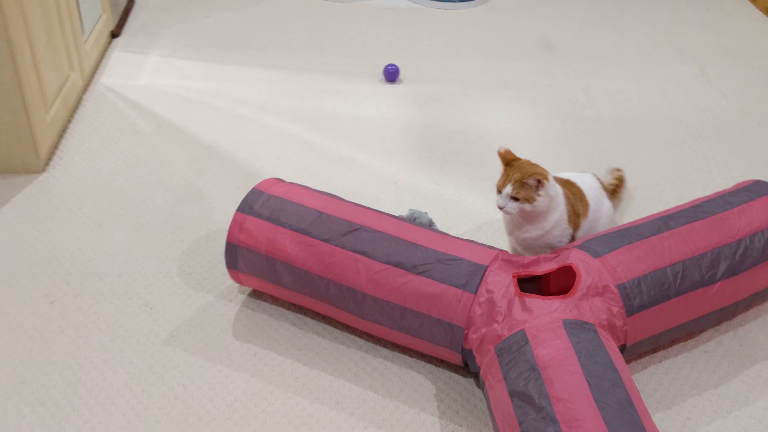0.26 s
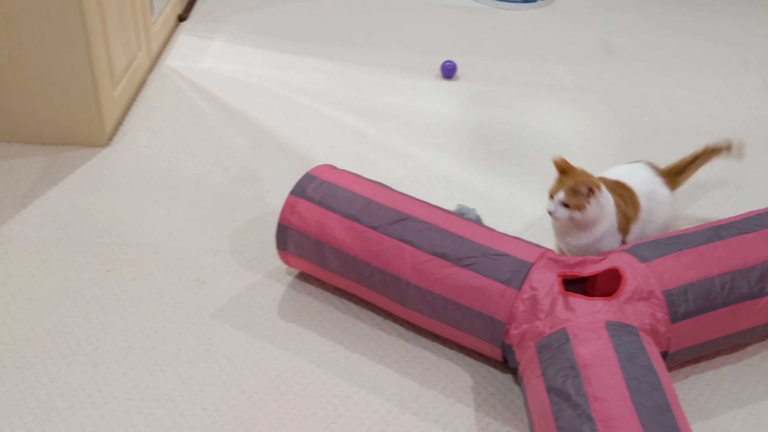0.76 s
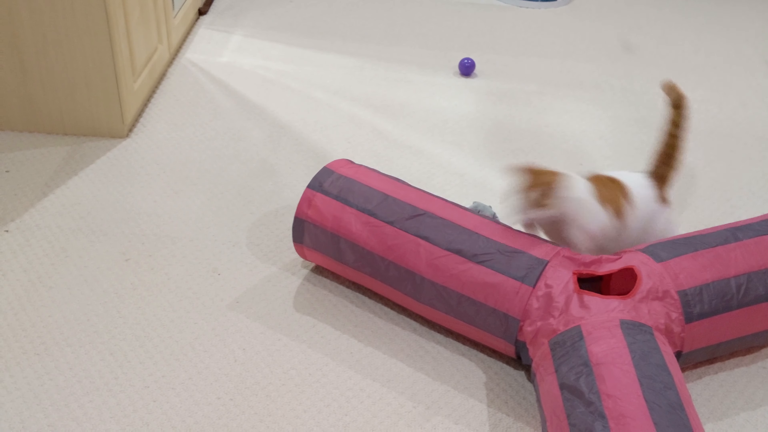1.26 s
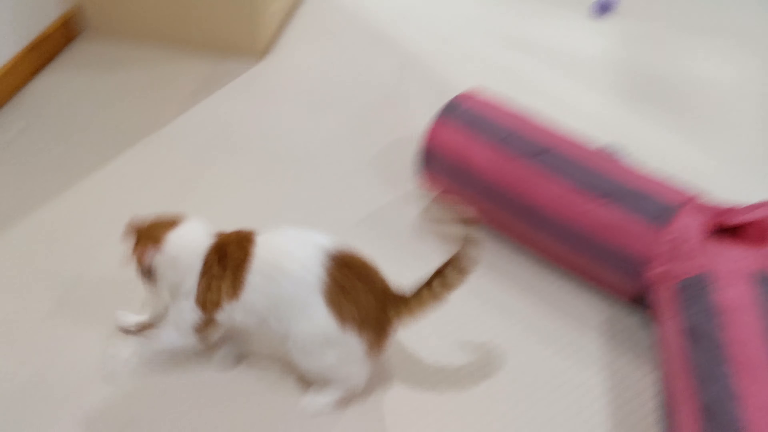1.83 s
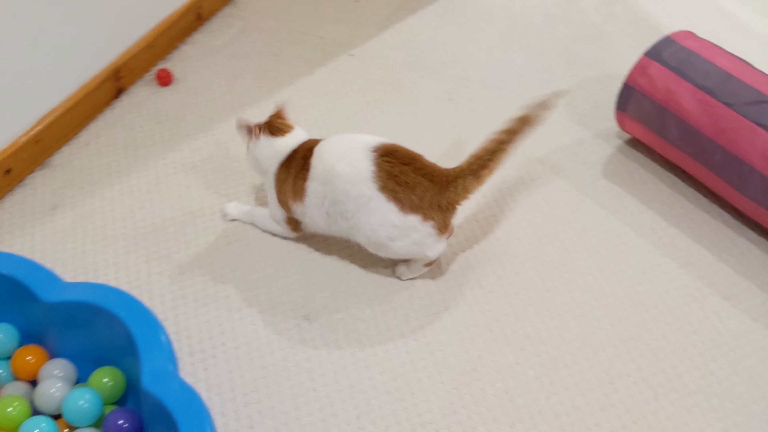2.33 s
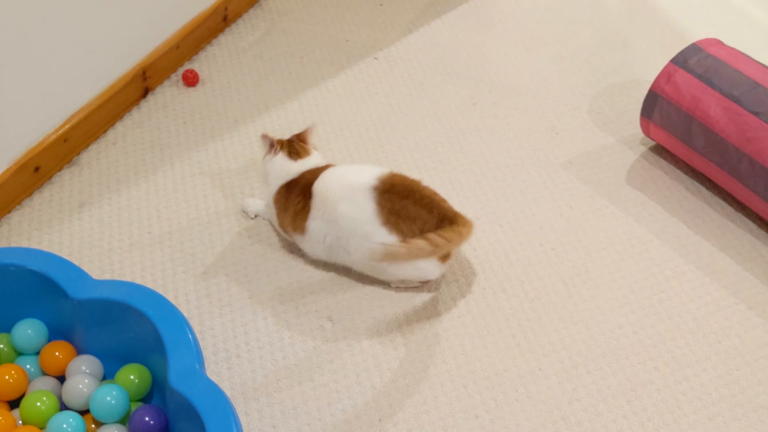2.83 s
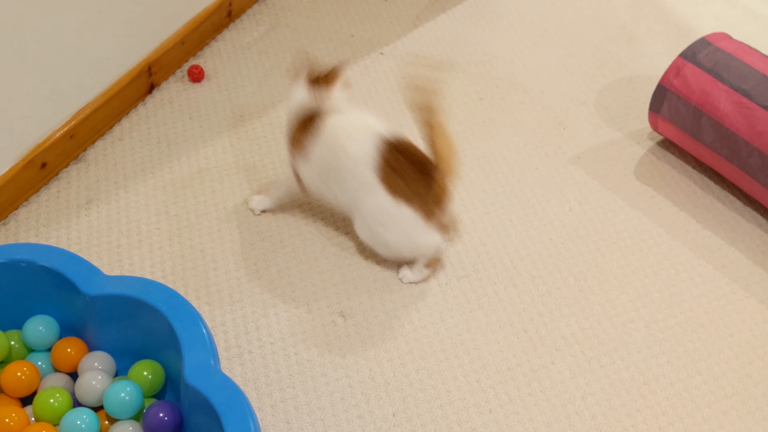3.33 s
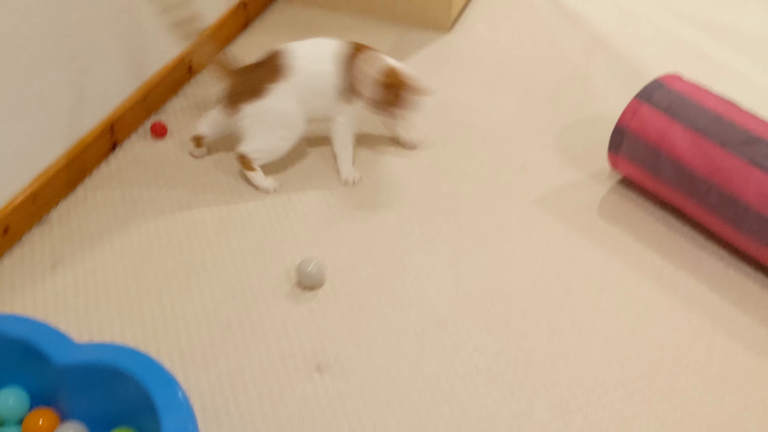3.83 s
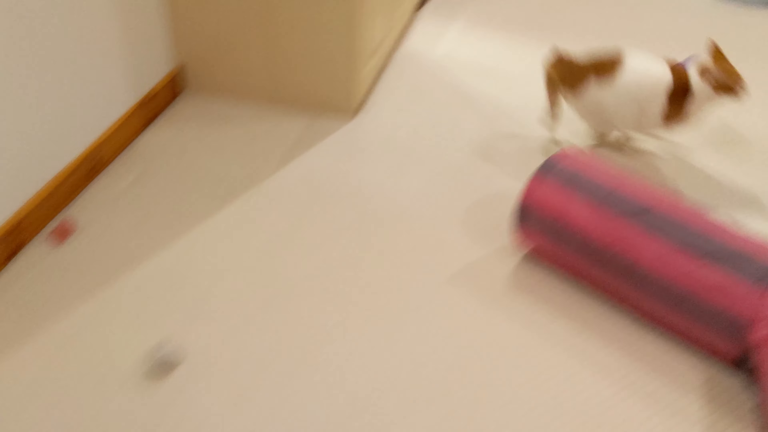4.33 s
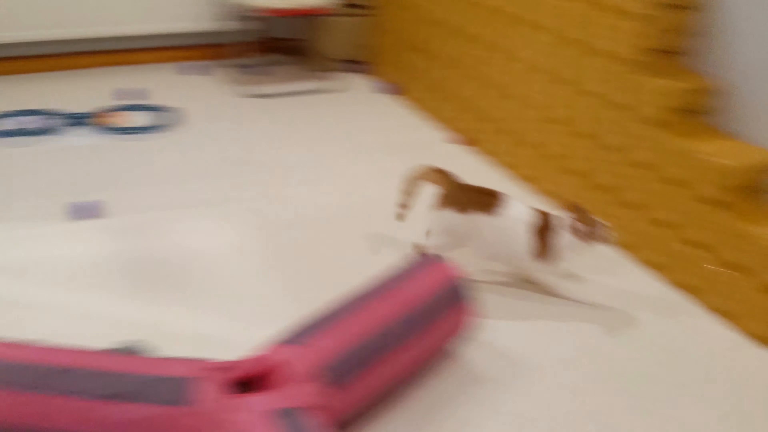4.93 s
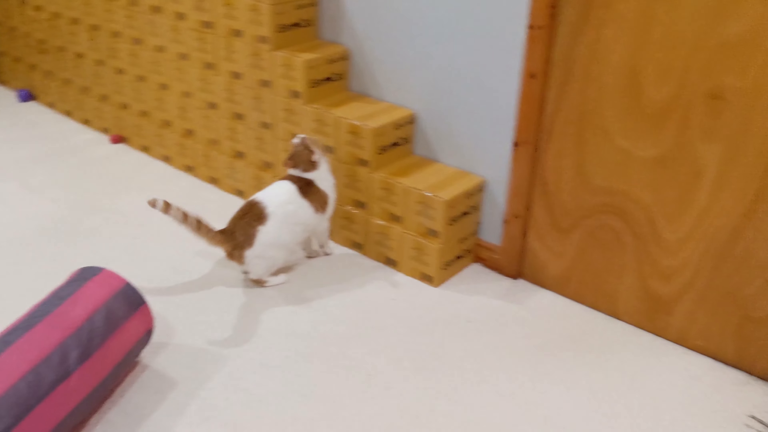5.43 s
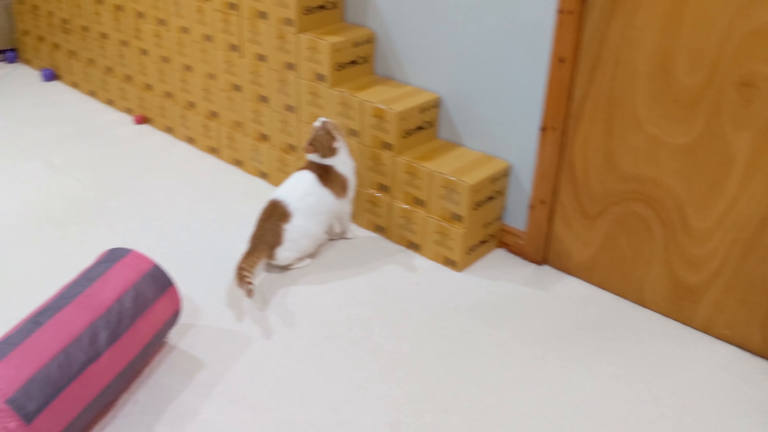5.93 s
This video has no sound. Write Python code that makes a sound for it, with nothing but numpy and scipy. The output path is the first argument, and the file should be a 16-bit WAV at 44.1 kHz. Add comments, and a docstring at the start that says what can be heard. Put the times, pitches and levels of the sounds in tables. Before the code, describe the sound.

A cat plays in a quiet carpeted room, heard through a hand-held phone with faint hiss and slight echo. For the first second and a half there are only light steps and small claw ticks. At about 1.7 seconds the cat lands with a cluster of muffled thumps on the boards under the carpet, then scrambles until 3 seconds, claws snagging and paws scuffing. After a brief lull, a hollow plastic ball drops at 3.4 seconds with a quick chattering knock. The busiest thumping and scratching follows around 3.7 seconds and becomes a running patter, with a faint thin hiss from 4.4 to 4.8 seconds. The steps fade out by about 5.3 seconds. From 5.5 to 6.2 seconds the cat meows once, a little further off, starting soft and closed-mouthed, then opening into a brighter, rising cry.

```python
"""A cat leaps over a cloth tunnel and scrambles about a carpeted room, followed by a hand-held phone.
From the start, paws thump the floor boards through the carpet while claws snag and drag in the pile.
At 3.4 s a hollow ball drops, and at 4.4 s there is a thin hiss as the cat runs past the tunnel.
At 5.5 s the cat sits further off and meows, first with its mouth closed, then open."""
import sys
import numpy as np
from scipy import signal
from scipy.fft import rfft, irfft
from scipy.io import wavfile
from scipy.ndimage import uniform_filter1d

SR = 44100
rng = np.random.default_rng(int(sys.argv[2]) if len(sys.argv) > 2 else 0)


def materialize(psi):
    """Save the field psi as 16-bit PCM at rate SR to the path in sys.argv[1].

    A 1-D psi becomes a single channel; in a 2-D psi each row is a channel.
    """
    bounded = np.clip(np.atleast_2d(psi).T, -1, 1)
    quanta = np.round(bounded * 32767).astype(np.int16)
    wavfile.write(sys.argv[1], SR, quanta)


N = 272538
T = np.arange(N) / SR

# Paws landing, and at 3.4 s the ball hitting the carpet.
# Each row: start in seconds, thump in dB, main pitch in Hz, boom in dB, slap in dB.
LANDINGS = [(0.295, -47.5, 199, -60, -39.5), (0.632, -50.5, 464, -70, -36.5), (0.866, -39, 336, -45, -36),
            (1.278, -67, 186, -44, -43), (1.462, -54, 227, -49, -38.5), (1.674, -23, 182, -33, -36),
            (1.6764, -25, 510, -50, -33), (1.685, -22.5, 181, -29, -26), (1.693, -26, 476, -52, -36),
            (1.696, -25.5, 186, -47, -45), (1.838, -36, 439, -52, -50), (1.858, -30.5, 484, -35, -35),
            (1.88, -34, 391, -30, -49), (1.955, -39, 447, -38, -50), (1.972, -26.5, 287, -35, -50),
            (1.985, -38, 294, -41, -48), (2.068, -36, 224, -48, -43), (2.157, -25, 181, -37, -43),
            (2.222, -24.5, 377, -48, -40), (2.24, -28, 197, -33, -49), (2.29, -23.5, 310, -37.5, -48),
            (2.342, -38, 430, -41, -57), (2.418, -19.5, 278, -35, -22.5), (2.452, -24, 276, -50, -39),
            (2.564, -20.5, 380, -32, -41), (2.812, -33.5, 355, -51, -20), (2.841, -26.5, 226, -40, -17),
            (2.925, -31.5, 225, -34.5, -32), (2.979, -29.5, 244, -36, -48), (3.409, -24.5, 218, -36, -13),
            (3.482, -28, 487, -46, -23.5), (3.529, -26, 229, -40, -28), (3.611, -20.5, 362, -32, -30.5),
            (3.684, -23.5, 360, -33.5, -31), (3.698, -16.5, 269, -34.5, -21), (3.719, -19, 485, -44, -29),
            (3.77, -24, 398, -54, -20.5), (3.916, -24, 304, -44, -52), (3.934, -31.5, 390, -48, -47),
            (4.013, -28.5, 230, -59, -28.5), (4.088, -26.5, 430, -37, -22.5), (4.139, -24, 336, -29.5, -39),
            (4.236, -30, 385, -37, -28.5), (4.247, -27.5, 184, -43, -36), (4.318, -31.5, 235, -40, -36),
            (4.331, -29, 196, -47, -33), (4.355, -30.5, 201, -47, -34), (4.432, -27, 193, -54, -25.5),
            (4.451, -25.5, 211, -49, -33), (4.493, -26, 225, -33.5, -30), (4.515, -26, 307, -39, -37),
            (4.575, -23.5, 312, -31.5, -26.5), (4.595, -25, 182, -40, -38), (4.63, -42, 223, -47, -42),
            (4.674, -35.5, 175, -36, -39), (4.813, -34.5, 225, -39, -37), (4.867, -35, 310, -32, -52),
            (4.928, -33, 146, -34, -45), (5.143, -45, 346, -48, -57), (5.249, -41.5, 174, -36, -45)]
# The notes of the floor boards. Each row: pitch in Hz, level in dB.
BOARD_NOTES = [(145, -8), (182, 2), (228, 2.5), (265, 2.5), (305, 2), (345, 0.5), (378, -1.5), (450, 1.5),
               (508, -0.5), (570, -12), (640, -8), (730, -4.5), (800, -8), (895, -12)]
# The hollow under the floor. Each row: pitch in Hz, level in dB, seconds to fade by 60 dB.
BOOM_NOTES = [(51.8, 5.5, 0.3), (74.8, 4, 0.31), (99, -41, 0.14), (124.8, -3.5, 0.29)]
# Claws catching. Each row: start in seconds, level in dB, extra dB for the highest band,
# fade time in seconds, extra dB for the middle band.
CLAW_SNAGS = [(0.1804, -37.5, 5.5, 0.014, 1.5), (0.295, -43.5, 5.5, 0.037, 1), (0.3204, -43, -18, 0.021, 2),
              (0.563, -46, -2, 0.02, -12), (0.6301, -39, 8.5, 0.029, -1), (0.678, -48, -15, 0.014, 5),
              (0.869, -47, 7, 0.025, -9), (0.8875, -43, 4.5, 0.03, -3), (1.2976, -42.5, -11, 0.016, -8),
              (1.3653, -45, -1, 0.017, -4), (1.4585, -44, 9.5, 0.018, 5.5),
              (1.607, -52.5, 10.5, 0.018, -11), (1.748, -48, 5.5, 0.016, 4),
              (1.8684, -34, -11, 0.016, -8.5), (1.934, -40.5, -0.5, 0.065, -3),
              (2.131, -36.5, 12.5, 0.011, -5), (2.1365, -41.5, -15, 0.038, -0.5),
              (2.221, -23.5, -1.5, 0.0058, -1), (2.2243, -34, 2, 0.012, -3), (2.759, -39, 9, 0.01, -3),
              (2.817, -41, -6, 0.015, -8), (2.8415, -28, -2, 0.0062, -2.5),
              (2.8577, -23.5, -14, 0.0066, -20), (2.9416, -38.5, -1.5, 0.024, -3.5),
              (3.41, -33, -19, 0.012, -12), (3.485, -28, -10, 0.0071, -13), (3.643, -42.5, 4, 0.1, -1),
              (3.703, -29.5, 3.5, 0.014, -4), (3.719, -34, 4, 0.025, -3), (3.77, -28, -10, 0.013, -6),
              (4.0102, -41, -7, 0.033, -12), (4.089, -28, -3, 0.004, 1.5), (4.091, -22.5, -14, 0.0035, -13),
              (4.0942, -21, -1.5, 0.0019, -6), (4.105, -36, -13, 0.012, -15),
              (4.235, -43.5, -8, 0.064, -11), (4.4307, -41.5, 2, 0.07, -0.5), (5.149, -43.5, -12, 0.04, -8),
              (5.251, -39.5, -4, 0.033, -5)]
# Paws scuffing. Each row: loudest moment, swell time and fade time in seconds, hiss and rumble in dB.
PAW_SCUFFS = [(1.29, 0.03, .16, -56.5, -62), (1.47, 0.026, 0.14, -56, -49),
              (1.708, 0.072, 0.18, -48.5, -41), (1.88, 0.084, 0.052, -48, -40.5),
              (1.97, 0.042, 0.23, -50, -42.5), (2.12, .2, 0.28, -52.5, -51),
              (2.228, 0.033, 0.05, -39.5, -32.5), (2.41, 0.19, 0.15, -47.5, -37.5),
              (2.75, 0.15, 0.18, -57.5, -47), (2.845, 0.068, 0.11, -43.5, -48),
              (2.875, 0.1, 0.023, -38, -35), (2.92, .1, 0.072, -54, -44.5),
              (3.35, 0.058, 0.18, -54.5, -49.5), (3.412, 0.0082, 0.074, -40, -62),
              (3.529, 0.15, 0.048, -42.5, -35), (3.66, 0.03, 0.3, -43, -43),
              (3.72, 0.11, 0.12, -38.5, -30.5), (3.75, 0.092, 0.089, -45, -42), (3.79, .1, 0.063, -43, -33),
              (3.98, 0.17, 0.16, -50, -49), (4.019, 0.04, 0.053, -44, -35),
              (4.099, 0.014, 0.098, -36.5, -37.5), (4.21, 0.26, .3, -59, -45.5),
              (4.38, 0.23, 0.056, -48, -58), (4.44, 0.037, .13, -42.5, -40.5), (4.6, 0.37, 0.73, -52, -49),
              (4.83, 0.03, 0.17, -46, -44.5), (4.93, 0.16, 0.4, -52.5, -50),
              (5.16, 0.027, 0.16, -55.5, -54.5), (5.257, 0.013, 0.11, -57, -51)]
# The tone of dragged carpet. Each row: frequency in Hz, gain in dB.
CARPET_TONE = [(350, -5), (600, 0.5), (1000, -9), (1600, -0.5), (3000, -7.5), (6000, -13.5), (9000, -45),
               (16000, -26)]
# The course of the meow. Each row: time in seconds, level in dB, mouth from 0 (shut) to 1 (open).
MEOW_SHAPE = [(5.485, -76, 0.0), (5.52, -49, 0.06), (5.58, -46, 0.22), (5.66, -41.5, 0.29),
              (5.77, -47.5, 0.2), (5.82, -45.5, 1), (5.87, -40, 0.96), (5.94, -44, 1), (5.98, -43, 1),
              (6.001, -32, 0.99), (6.0125, -44, 1), (6.023, -35, 1), (6.042, -34, 0.94), (6.07, -38, 1),
              (6.11, -39.5, 0.93), (6.15, -46, 0.6), (6.18, -50, 0.2)]
# The tune of the meow. Each row: time in seconds, pitch in Hz.
MEOW_TUNE = [(5.485, 482), (5.57, 447), (5.65, 432), (5.73, 442), (5.78, 463), (5.85, 512), (5.94, 563),
             (6.0, 576), (6.035, 588), (6.05, 636), (6.085, 645), (6.13, 634), (6.18, 602)]
# The tone of the voice with the mouth shut, and open. Each row: frequency in Hz, gain in dB.
SHUT_TONE = [(440, 4), (880, -6.5), (1320, -14), (1760, -22), (2200, -33), (4400, -33), (9000, -51)]
OPEN_TONE = [(500, -13), (575, -15), (635, 2), (1020, -0.5), (1130, 4.5), (1150, 11), (1200, 7.5),
             (1280, -16), (1540, -1), (1620, 0), (1730, 1), (1900, 4), (2050, -6), (2150, 2), (2260, 8.5),
             (2380, -9.5), (2550, -17), (2800, -29), (4000, -24), (4700, -28), (6200, -23.5), (8000, -34)]
# A narrow ring near 4.2 kHz lingers at the height of the cry. Each row: time in seconds, level in dB.
HIGH_RING = [(5.975, -68), (6.012, -46), (6.07, -41), (6.145, -73)]
# The ball landing. Each row: start in seconds, level in dB.
BALL_KNOCKS = [(3.4101, -23.5), (3.416, -18), (3.4275, -31), (3.437, -28), (3.4478, -26)]
# The ball's shell. Each row: pitch in Hz, level in dB, seconds to fade by 60 dB.
BALL_NOTES = [(780, 11, 0.014), (995, 15, 0.014), (1450, 3, 0.022), (714, -7, .08), (813, 0, 0.09),
              (900, 3.5, 0.09), (1090, -6, 0.081), (1310, -8, 0.096), (1492, -6, 0.067)]
# The thin hiss by the tunnel. Each row: time in seconds, level in dB.
HISS_LEVELS = [(4.43, -55.5), (4.6, -58.5), (4.77, -61.5)]
# Its two bands. Each row: centre in Hz, width in Hz, level in dB.
HISS_BANDS = [(1590, 330, -0.15), (4130, 490, -2.6)]
# Echoes from the walls, and from the floor, hand and furniture close by.
# Each row: band centre in Hz, seconds to fade by 60 dB, level in dB.
WALL_ECHOES = [(57, 0.87, -14), (187.6, 0.46, 2.5), (682, 0.39, 6), (2060, 0.36, 3.5), (5600, 0.17, 7.5),
               (13900, 0.066, -19)]
CLOSE_ECHOES = [(3000, .04, 11), (10000, .03, 11)]
# The tone of room hush and microphone hiss. Each row: frequency in Hz, gain in dB.
HUSH_TONE = [(15, -8), (35, -0.5), (60, -12), (110, -14.5), (200, -16), (400, -21.5), (700, -25.5),
             (1500, -30.5), (3000, -32.5), (7000, -36), (16000, -29.5)]
# The hand swaying the phone. Each row: time in seconds, level in dB.
HAND_SWAY = [(0.0, -46), (0.07, -42.5), (0.24, -67), (0.33, -43), (0.48, -37), (0.7, -56.5), (1.1, -42.5),
             (1.15, -64), (1.31, -30), (1.38, -41.5), (1.51, -29.5), (1.67, -44), (1.72, -34),
             (2.08, -48.5), (3.46, -49), (3.51, -57), (3.65, -41), (3.79, -64), (4.01, -41), (4.22, -64),
             (4.32, -35), (4.39, -44), (4.49, -32.5), (4.78, -37), (4.84, -31), (5.56, -39.5),
             (5.65, -49.5), (6.18, -58)]
# Stereo width. Each row: frequency in Hz, dB of what differs between the sides against what they share.
STEREO_WIDTH = [(30, -20), (60, -13), (125, -11), (250, -4), (500, -1), (1000, 0), (2000, 0)]
# The phone's two microphone openings. Each row: frequency in Hz, left minus right in dB.
MIC_BALANCE = [(300, 0), (550, 2), (1000, -1), (2200, -3), (8500, -3), (13000, 3)]
# The tone those openings give. Each row: frequency in Hz, gain in dB.
MIC_TONE = [(1000, -2), (1600, -1.5), (1950, -6.5), (2400, -1.5), (3300, 0.5), (4800, 0.5), (5600, 4.5),
            (6800, -0.5), (7500, 4), (8500, -5), (9500, -1), (10700, -8), (12500, -6.5), (14500, -6.5)]


def landings():
    """A paw or the ball lands: it rings the boards, booms under the floor and slaps the carpet."""
    out, t = np.zeros(N), T[:SR // 4]
    board_hz, board_db = np.transpose(BOARD_NOTES)
    hollow_hz, hollow_db, hollow_fade_s = np.transpose(BOOM_NOTES)
    fade_s, rise_s = np.full(len(board_hz), 0.13), 0.0014  # carpet stops the boards quickly
    for start, thump_db, main_hz, boom_db, slap_db in LANDINGS:
        # every spot on the floor sounds a little different
        weight, detune, phase = rng.standard_normal((3, len(board_hz)))
        note_db = board_db - 26 * np.abs(np.log2(board_hz / main_hz)) + 3.16 * weight
        thump = ring(board_hz * (1 + 0.015 * detune), note_db, fade_s, rise_s, 0.3 * phase)
        add(out, start, amp(thump_db) * thump)
        boom_hz = hollow_hz * (1 + 0.058 * detune[:len(hollow_hz)])
        boom = ring(boom_hz, hollow_db, hollow_fade_s, rise_s=0.0073, phase=phase[:len(boom_hz)])
        add(out, start, amp(boom_db) * boom)
        slap = band(band(rng.standard_normal(len(t)), 436, 1530), 424, 1460)
        add(out, start, amp(slap_db - 60 * t / 0.15) * slap * (1 - np.exp(-t / rise_s)))
    return out


def claws():
    """A claw catches with a snap, then a dying crackle; fine threads add a bright top."""
    out, t = np.zeros((2, N)), T[:8192]
    for start, db, high_db, fade_s, middle_db in CLAW_SNAGS:
        threads = stereo_crackle(len(t), per_second=4000, scatter_db=3.0)
        burst = threads * np.exp(-t / max(fade_s, .002)) * (1 - np.exp(-t / .001))
        burst[:, 0] += 4.5  # the first snap
        middle = amp(middle_db) * band(burst, 6550, 7700)
        high = amp(high_db) * band(burst, 9720, 18400)
        add(out, start, amp(db) * (band(burst, 1930, 4130) + middle + high))
    return out


def scuffs():
    """Paws stick and slip in the carpet: the fibres hiss and uneven shoves rumble the boards."""
    fibres = stereo_crackle(N, per_second=6000, scatter_db=2.2)
    hiss = level(colour(fibres, CARPET_TONE), 0) + level(band(fibres, 7900, 21700), -6.5)
    shoves = crackle(N, per_second=400, scatter_db=2.5)
    rumble = sum(amp(db) * band(shoves, 0.906 * hz, 1.047 * hz) for hz, db in BOARD_NOTES)
    hiss_power, rumble_power = np.zeros((2, N))
    for peak_s, swell_s, fade_s, hiss_db, rumble_db in PAW_SCUFFS:
        drop_db = 20 * np.where(T < peak_s, (peak_s - T) / swell_s, (T - peak_s) / fade_s)
        hiss_power += amp(hiss_db - drop_db) ** 2
        rumble_power += amp(rumble_db - drop_db) ** 2
    slip = amp(1.5 * wander(50))
    return slip * (hiss * np.sqrt(hiss_power) + level(rumble, 0) * np.sqrt(rumble_power))


def meow():
    """The vocal folds make a slightly shaky note whose overtones brighten as the mouth opens."""
    (level_db, mouth), gate = curves(MEOW_SHAPE)
    hz = np.interp(T, *np.transpose(MEOW_TUNE))
    shake = .003 * wander(50) + .011 * wander(250)
    phase = 2 * np.pi * np.cumsum(hz * (1 + shake)) / SR
    voice = np.zeros(N)
    for k in range(1, 14):
        tone_db = mouth * look_up(OPEN_TONE, k * hz) + (1 - mouth) * look_up(SHUT_TONE, k * hz)
        voice += amp(level_db + tone_db) * np.sin(k * phase)
    # strong and weak cycles take turns, mostly while the mouth is shut
    voice *= 1 + (.24 * (1 - mouth) + .03 * mouth) * np.cos(phase / 2)
    flutter = amp(1.4 * wander(60) + 1.4 * wander(200))
    leak = rng.standard_normal(N)  # air leaks past the folds
    breath = level(band(leak, 3630, 4500), -70.5) + level(band(leak, 670, 1600), -68)
    (ring_db,), ring_gate = curves(HIGH_RING)
    high_ring = ring_gate * amp(ring_db) * band(np.sin(7 * phase) + 3 * leak, 4120, 4260)
    return gate * (band(voice, 230, 12000) * flutter + high_ring + breath)


def ball():
    """The hollow plastic ball knocks twice as it lands, chatters to rest and rings briefly."""
    out = np.zeros(N)
    knock = ring(*np.transpose(BALL_NOTES), rise_s=0.0011, phase=np.zeros(len(BALL_NOTES)))
    for start, db in BALL_KNOCKS:
        add(out, start, amp(db) * knock)
    return out


def thin_hiss():
    """Two narrow bands of hiss as the cat runs past the tunnel."""
    (level_db,), gate = curves(HISS_LEVELS)
    noise = rng.standard_normal(N)
    hiss = sum(level(band(noise, hz - width / 2, hz + width / 2), db) for hz, width, db in HISS_BANDS)
    return gate * amp(level_db) * hiss


def room(x, echo_db):
    """A sound reaches the phone directly, then as echoes from nearby things and the walls."""
    size = SR // 2
    t, noise = T[:size], stereo_noise(size)
    spectrum = rfft(sum(band(noise, hz / 2, hz * 2) * amp(db - 60 * t / fade_s)
                        for hz, fade_s, db in WALL_ECHOES + CLOSE_ECHOES))
    # smooth the random echo's spectrum so neighbouring pitches echo about equally loudly
    power = np.abs(spectrum) ** 2
    spectrum *= np.sqrt(uniform_filter1d(power, size=300) / uniform_filter1d(power, size=30))
    gate = (1 - np.exp(-(t / .002) ** 2)) * (t < .45)
    tail = irfft(spectrum, size) * gate / np.sqrt(SR * .03)
    echoes = signal.fftconvolve(np.atleast_2d(x), tail, axes=1)[:, :N]
    return two_mics(x + amp(echo_db) * echoes)


def hush():
    """Room hush and microphone hiss, flickering a little."""
    flicker = amp(.7 * wander(6))
    return level(two_mics(colour(stereo_noise(N), HUSH_TONE)), -49.5) * flicker


def hand():
    """The hand trembles and sways the phone, almost too low to hear."""
    (sway_db,), _ = curves(HAND_SWAY)
    tremble = level(band(rng.standard_normal(N), 20.3, 29.8), -10)
    sway_hz = 17 * (1 + 0.1365 * wander(6.1))
    sway = np.sqrt(2) * np.sin(2 * np.pi * np.cumsum(sway_hz) / SR)
    return amp(sway_db) * (tremble + sway)


def two_mics(x, lag_s=.00006):
    """Sound reaches the two microphone openings a moment apart and with a different tone."""
    hz = np.fft.rfftfreq(N, 1 / SR)
    left = amp(look_up(MIC_BALANCE, hz) / 2) * np.exp(1j * np.pi * lag_s * hz)
    return irfft(rfft(x) * np.array([left, 1 / left]), N)


def ring(hz, db, fade_s, rise_s, phase):
    """Fading notes set off by a push that takes rise_s; the peak is 1."""
    t = T[:SR // 3]
    notes = amp(db)[:, None] * np.sin(2 * np.pi * hz[:, None] * t + phase[:, None])
    notes *= amp(-60 * t / fade_s[:, None])
    out = (1 - np.exp(-t / rise_s)) * notes.sum(axis=0)
    return out / np.abs(out).max()


def crackle(size, per_second, scatter_db):
    """Tiny clicks of very different sizes at random moments."""
    when, sign, strength = rng.random((3, size))
    clicks = (when < per_second / SR) * np.sign(sign - .5)
    return level(clicks * amp(-scatter_db * np.log(strength)), 0)


def stereo_crackle(size, per_second, scatter_db):
    """A patch of crackle: each side hears partly different fibres."""
    shared = crackle(size, per_second, scatter_db)
    side = colour(crackle(size, per_second, scatter_db), STEREO_WIDTH)
    return np.array([shared + side, shared - side]) / np.sqrt(2)


def stereo_noise(size):
    """Noise whose two sides are alike in the bass and unrelated in the treble."""
    shared, side = rng.standard_normal((2, size))
    side = colour(side, STEREO_WIDTH)
    return np.array([shared + side, shared - side])


def wander(per_second):
    """A smooth random wobble."""
    hold = int(SR / per_second)
    steps = np.repeat(rng.standard_normal(N // hold + 1), hold)
    return 1.3 * uniform_filter1d(uniform_filter1d(steps, hold), hold)[:N]


def curves(table):
    """A table's columns at every sample, and a gate that fades to silence outside its times."""
    times, *columns = np.transpose(table)
    gate = np.interp(T, [times[0] - .03, times[0], times[-1], times[-1] + .03], [0, 1, 1, 0])
    return [np.interp(T, times, column) for column in columns], gate


def look_up(table, hz):
    """Read a tone table's dB at any frequency."""
    table_hz, db = np.transpose(table)
    return np.interp(np.log(hz + 1), np.log(table_hz + 1), db)


def colour(x, table):
    """Filter a sound by a tone table."""
    size = x.shape[-1]
    return irfft(rfft(x) * amp(look_up(table, np.fft.rfftfreq(size, 1 / SR))), size)


def band(x, lo_hz, hi_hz):
    """Keep what lies between two frequencies."""
    return signal.sosfilt(signal.butter(2, [lo_hz, min(hi_hz, .45 * SR)], "band", fs=SR, output="sos"), x)


def amp(db):
    """Turn dB into a multiplier."""
    return 10 ** (np.asarray(db) / 20)


def level(x, db):
    """Set a sound's average (rms) level."""
    return x * amp(db) / np.sqrt(np.mean(x ** 2))


def add(track, start_s, sound):
    """Mix a sound in at a given time."""
    i = int(start_s * SR)
    track[..., i:i + sound.shape[-1]] += sound[..., :N - i]


def scene():
    """Everything in one room; the meow is further off, so it has more echo."""
    near = room(landings() + claws() + scuffs() + ball() + thin_hiss(), echo_db=-7.5)
    far = room(meow(), echo_db=-6)
    return near + far + hush() + hand()


def record(dry):
    """The microphone openings colour the treble and the phone cuts off the very top."""
    top_cut = signal.ellip(8, .2, 60, 15900, fs=SR, output="sos")
    return signal.sosfilt(top_cut, colour(dry, MIC_TONE))


dry = scene()
out = record(dry)
materialize(out)
```